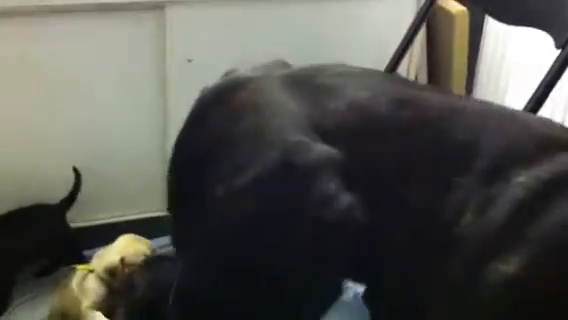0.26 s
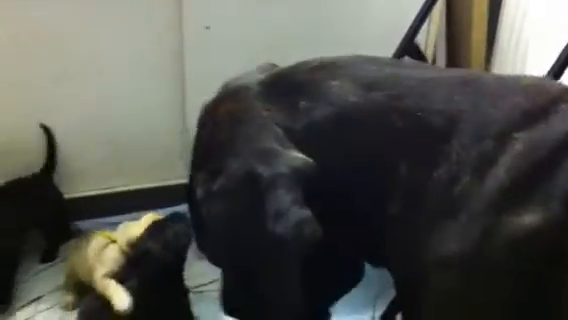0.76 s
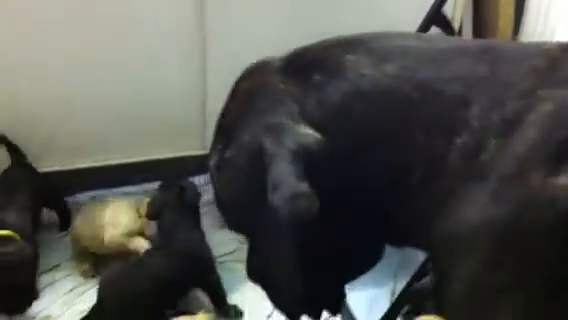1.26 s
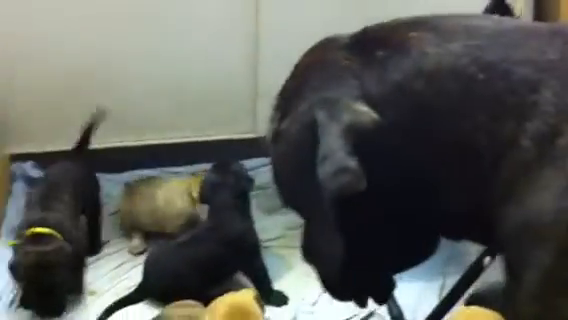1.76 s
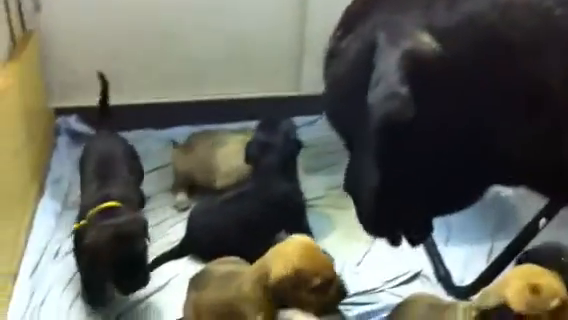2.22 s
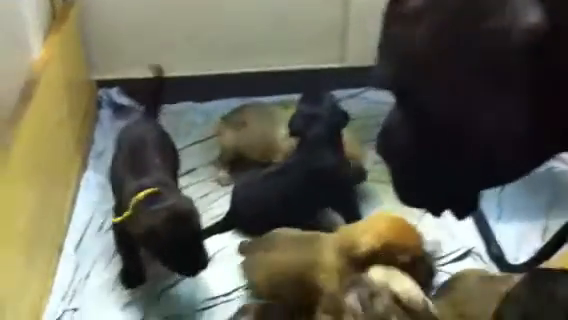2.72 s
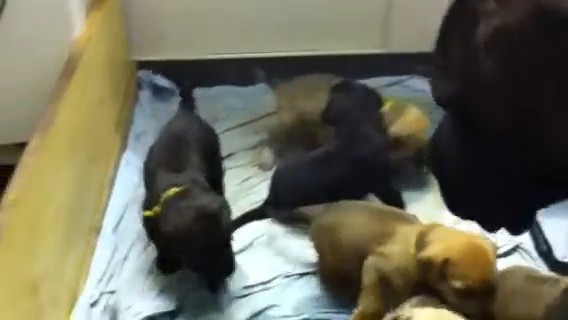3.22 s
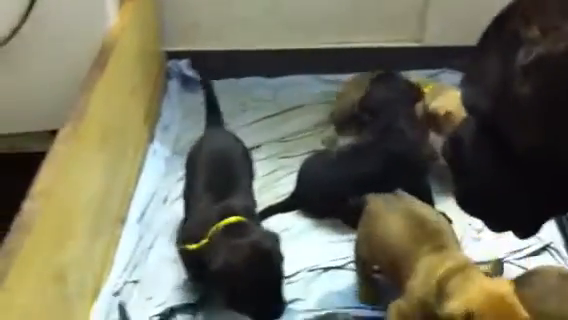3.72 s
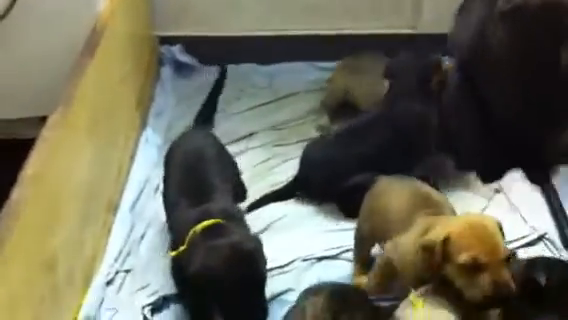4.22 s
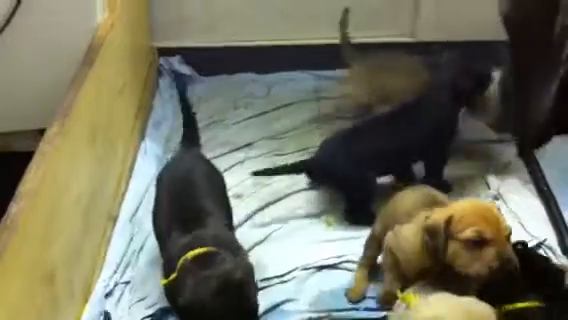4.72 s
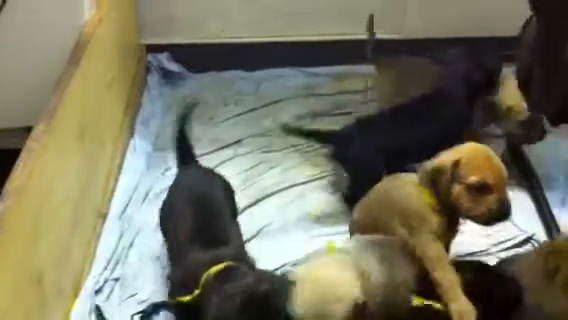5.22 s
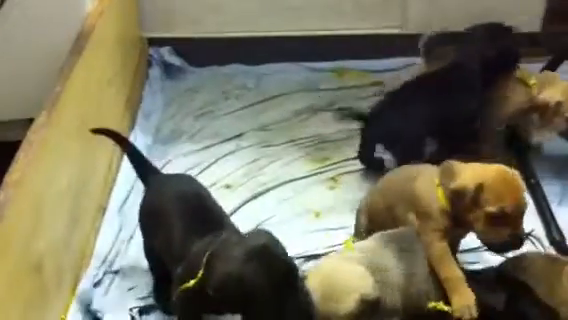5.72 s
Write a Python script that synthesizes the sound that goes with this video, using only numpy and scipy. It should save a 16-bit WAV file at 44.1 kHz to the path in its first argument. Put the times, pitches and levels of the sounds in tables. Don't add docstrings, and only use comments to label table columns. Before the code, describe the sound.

A close single microphone in a whelping box hears near quiet at first, then faint puppy grunts and short whimpers. The middle bursts into several piercing yelps with rough, growly tails, ringing briefly off hard walls. Afterwards the calls shrink to low grunts, a breaking squeak and breathy whimpers, while paws scrape dry, papery sheeting and claws tick. Soft room hum stays underneath.

```python
import sys
import numpy as np
from scipy import signal
from scipy.io import wavfile
from scipy.ndimage import uniform_filter1d

SR = 44100
rng = np.random.default_rng(int(sys.argv[2]) if len(sys.argv) > 2 else 0)


def log_audio(samples):
    frames = np.atleast_2d(samples).T
    limited = np.clip(frames, -1, 1)
    pcm = np.round(limited * 32767).astype(np.int16)
    wavfile.write(sys.argv[1], SR, pcm)


def natural_amplitude(level_db):
    exponent = np.asarray(level_db, float) / 20
    return 10 ** exponent


N = 263409


def evened(x):
    return x / np.sqrt(np.mean(x ** 2) + 1e-20)


def smooth_twice(x, size):
    return uniform_filter1d(uniform_filter1d(x, size=size), size=size)


def read(points, hz):
    f, value = np.transpose(points)
    return np.interp(np.log(hz + 1), np.log(f + 1), value)


def add(mix, s, sound):
    part = mix[round(s * SR):][:len(sound)]
    part += sound[:len(part)]


def resonate(x, hz, width):
    turn = np.exp(2j * np.pi * np.cumsum(hz * np.ones(len(x))) / SR)
    r = np.exp(-np.pi * width / SR)
    return 2 * (turn * signal.lfilter([1 - r], [1, -r], x / turn + 1e-18)).real


def steep(x, hz, width):
    return resonate(resonate(x, hz, width), hz, width)


def coloured(points, patchy_db, swell_db):
    frames, hz = N // 256 + 5, np.fft.rfftfreq(1024, 1 / SR)
    a, b, patches = rng.standard_normal((frames, 513, 3)).T
    patches = uniform_filter1d(patches, size=6, axis=0)
    patches = evened(uniform_filter1d(patches, size=10, axis=1))
    swell = evened(uniform_filter1d(rng.standard_normal(frames), size=12))
    shape = np.where(hz < points[-1][0], read(points, hz), -120)[:, None]
    z = (a + 1j * b) * natural_amplitude(shape + patchy_db * patches + swell_db * swell)
    return evened(signal.istft(z, nperseg=1024, noverlap=768)[1][:N])


def room_hum():
    # (frequency [Hz], density [dB per Hz])
    hum_colour = [(15, -82.5), (25, -44.5), (80, -29), (174, -2.5), (359, -3), (389, -20), (470, -2),
                  (763, -12.5), (999, -10), (1760, -21.5), (15600, -24.5)]
    return natural_amplitude(-63.5) * coloured(hum_colour, patchy_db=3.0, swell_db=.5)


def larynx(t, hz, rough):
    wobble, shimmer, noise = rng.standard_normal((3, SR // 2))
    wobble = evened(uniform_filter1d(wobble, size=120))[:len(t)]
    shimmer = evened(smooth_twice(shimmer, 150))[:len(t)]
    turns = np.cumsum(uniform_filter1d(hz, size=200) * (1 + (.01 + .11 * rough) * wobble)) / SR
    k = np.arange(1, 30)[:, None]
    spread = rng.random(k.shape) * np.clip(k / 8, 0, 1)
    harmonics = np.cos(2 * np.pi * (k * turns + spread)) * (k * hz < 7500)
    folds = evened(harmonics.sum(axis=0))
    puffs = evened((.5 + np.exp(-(turns % 1) / .3)) * noise[:len(t)])
    uneven = natural_amplitude(3 * rough * np.clip(shimmer, -1.5, 1.5))
    drive = uneven * ((1 - rough) * folds + rough * puffs)
    airy = uneven * ((1 - rough) * folds + (1.2 * rough + .12) * puffs)
    return drive, airy, puffs


def chest_tone(drive, rough, chest_hz):
    shut = np.clip((480 - chest_hz) / 150, 0, 1)
    nasal = (0.45 + 1.4 * rough) * steep(drive, 790, 330)
    low = 2.1 * steep(drive, chest_hz, 150) + nasal
    return evened((1 - shut) * steep(drive, chest_hz, 370) + shut * low)


def bright_tone(airy, puffs, hiss_db, whistle_db, short):
    # (centre [Hz], width [Hz], level [dB])
    throat_bands = [(2824, 320, -0.5), (3790, 2100, 10.5), (4580, 2170, 13.5), (5724, 1380, 2)]
    # (centre [Hz], width [Hz], level [dB])
    teeth_bands = [(7200, 3700, 11), (8490, 2000, -6), (10150, 660, 3)]
    flutter = evened(smooth_twice(rng.standard_normal((4, SR // 2)), 900))[:, :len(airy)]
    throat = np.zeros(len(airy))
    for n, (f, width, db) in enumerate(throat_bands):
        throat += (-1) ** n * natural_amplitude(db + 3.3 * flutter[n]) * steep(airy, f * short, width)
    teeth = evened(sum(natural_amplitude(db) * steep(puffs, f, width) for f, width, db in teeth_bands))
    whistle = evened(steep(steep(puffs, 12200, 2600), 12200, 2600))
    return evened(throat) + natural_amplitude(hiss_db) * teeth + natural_amplitude(whistle_db) * whistle


def voice(rows, hiss_db, whistle_db, short):
    # (time [s], roughness [0 clear whistle to 1 growl]); a breathy puff opens the loud yelps
    roughness = [(.69, .08), (1, .15), (1.3, .35), (1.41, .4), (1.43, .12), (1.7, .15), (1.8, .6),
                 (1.85, .2), (1.9, .18), (1.96, .25), (2.105, .6), (2.125, .06), (2.21, .08), (2.225, .3),
                 (2.33, .3), (2.35, .85), (2.45, .85), (2.615, .5), (2.64, .13), (2.72, .13), (2.75, .75),
                 (2.8, .75), (2.83, .7), (2.89, .7), (3.09, .9), (3.105, .8), (3.115, .2), (3.16, .3),
                 (3.24, .35), (3.26, .08), (3.39, .08), (3.585, .7), (3.6, .12), (3.675, .12), (3.69, .3),
                 (3.78, .2), (3.87, .15), (4.022, .7), (4.035, .04), (4.095, .05), (4.125, .18), (4.15, .6),
                 (4.23, .65), (4.38, .2), (4.7, .15), (4.84, .05), (4.9, .05), (4.92, .2), (4.99, .3),
                 (5.24, .4), (5.26, .15), (5.33, .3), (5.43, .3), (5.59, .9), (5.76, .9), (5.92, .5),
                 (5.95, .3)]
    # (time [s], centre [Hz])
    chest_curve = [(.7, 520), (.75, 347), (1.05, 220), (1.27, 298), (1.42, 790), (1.6, 696), (1.85, 740),
                   (1.93, 614), (2.2, 670), (2.24, 860), (2.33, 890), (2.35, 320), (2.45, 320), (2.62, 863),
                   (2.73, 810), (2.79, 630), (2.81, 300), (2.89, 290), (3.1, 722), (3.17, 947), (3.26, 714),
                   (3.67, 715), (3.7, 666), (3.74, 797), (4.09, 600), (4.12, 730), (4.14, 320), (4.4, 236),
                   (4.7, 250), (4.84, 850), (4.95, 884), (5.3, 760), (5.76, 696), (5.92, 1305)]
    s, *columns = np.transpose(rows)
    t = np.arange(s[0], s[-1], 1 / SR)
    mouth_db, hz, mouth_hz, chest_db, bright_db = (np.interp(t, s, c) for c in columns)
    rough = np.interp(t, *np.transpose(roughness))
    chest_hz = np.interp(t, *np.transpose(chest_curve))
    drive, airy, puffs = larynx(t, hz, rough)
    chest = chest_tone(drive, rough, chest_hz)
    mouth = resonate(steep(drive, mouth_hz, 700), mouth_hz, 1500)
    mouth = evened(mouth + 0.099 * steep(drive, 2130, 720))
    bright = bright_tone(airy, puffs, hiss_db, whistle_db, short)
    opening = np.clip((t - s[0]) / .022, 0, 1)
    sound = mouth + natural_amplitude(chest_db) * chest + natural_amplitude(bright_db) * bright * opening
    edge = np.clip(np.minimum((t - s[0]) / 0.003, (s[-1] - t) / .012), 0, 1)
    return s[0], natural_amplitude(mouth_db) * sound * np.sin(np.pi / 2 * edge) ** 2


def puppies():
    # (time [s], mouth level [dB], pitch [Hz], mouth resonance [Hz],
    # chest level [dB re mouth], bright level [dB re mouth])
    early = [
        [(.69, -70.5, 474, 1470, 22, -16), (.712, -61.5, 456, 1480, 11, -25), (.727, -82, 450, 1480, 0, -12),
         (.734, -77.5, 360, 1600, 23, -14), (.77, -80, 348, 1600, 9, -9)],
        [(1.022, -74, 232, 1540, 12, -14), (1.035, -60, 241.7, 1420, 15, -23),
         (1.055, -78, 213.5, 1510, 20, -17), (1.085, -82, 217, 1550, 25, -8)],
        [(1.24, -76, 259, 1580, -7, -10), (1.262, -71, 256, 1570, 11, -10), (1.3, -90, 252, 1580, 13, -5)],
        [(1.415, -57, 515, 1630, -4, -33), (1.44, -49, 571.4, 1650, 0.5, -10),
         (1.48, -34, 549.7, 1600, -13, -9), (1.51, -53.5, 521.5, 1550, 4, 7.5),
         (1.535, -43.5, 494.5, 1670, -2, -12), (1.575, -63, 484, 1910, -2, -8)],
        [(1.535, -61, 668, 1870, 4, -15), (1.57, -51, 661, 1900, -0.5, -26), (1.63, -74.5, 668, 1970, 11, -15),
         (1.69, -69, 672, 1950, 6, -16)],
        [(1.805, -56, 402.6, 2010, 1.5, -20), (1.833, -50, 406.5, 1730, 1, -24),
         (1.87, -54, 438, 1390, 1, -18.5), (1.903, -55, 459.5, 1860, 6, -26.5),
         (1.915, -57.5, 402, 1890, 15, -23.5), (1.955, -72.5, 388, 1840, 6.5, -15.5)],
        [(2.107, -43.5, 567, 1550, -16, -18.5), (2.13, -35, 595, 1390, -25, -7),
         (2.15, -19, 678.6, 1560, -34.5, -8), (2.168, -12, 757, 1563, -31.5, -7.5),
         (2.19, -16, 745.4, 1587, -31.5, -4.5), (2.214, -22, 717.3, 1420, -40, 1.5),
         (2.228, -16, 518, 1550, -11.5, -8.5), (2.26, -31.5, 459, 1710, -6.5, 2.5),
         (2.3, -28.5, 437, 1620, -10, -18), (2.335, -43, 430.5, 1530, 5, -33),
         (2.35, -38.5, 306.6, 1600, 0, -4), (2.41, -49.5, 298.4, 1534, 6.5, -16.5),
         (2.45, -66, 283, 1575, 8.5, -11)],
        [(2.615, -46.5, 386, 1780, 2, -23), (2.635, -34.5, 412.6, 1740, -13.5, -13),
         (2.66, -26.5, 474.5, 1890, -14.5, -5), (2.682, -26.5, 511, 1760, -8, -3.5),
         (2.705, -27, 480, 1850, -21, 0), (2.735, -21.5, 435.3, 1700, -12.5, -13.5),
         (2.755, -52, 431, 1770, 18.5, -13), (2.77, -34, 302, 1710, 5, -5), (2.79, -52.5, 261.9, 1800, 12, -1),
         (2.84, -54.5, 272.2, 1740, 15, -4.5), (2.89, -104.5, 270, 1800, 1, -11)],
    ]
    # ([s], [dB], [Hz], [Hz], [dB], [dB])
    late = [
        [(3.092, -28, 566, 1936, -12.5, -6), (3.112, -24, 576.6, 1710, -30, -4.5),
         (3.135, -18, 668.2, 1806, -35, -6), (3.155, -11, 759.5, 1856, -22, -7),
         (3.168, -17.5, 489.4, 1870, -17.5, -2), (3.19, -19, 436.8, 1700, -8, -2),
         (3.22, -29, 417.4, 1730, -18, -6), (3.255, -37, 392, 1740, 2, -11.5),
         (3.275, -53.5, 381.7, 1680, 1.5, 2), (3.325, -63, 388, 1670, 22.5, -6),
         (3.365, -51, 405.5, 1670, 7, -19), (3.388, -79, 409, 1814, 1, -5)],
        [(3.587, -41, 587.8, 1610, -35, -0.5), (3.615, -27, 617.2, 1536, -53.5, -11),
         (3.638, -19, 706, 1570, -41, -7), (3.657, -22, 737.8, 1620, -18, -7),
         (3.676, -16, 734.7, 1600, -47, -10), (3.688, -22.5, 513.4, 1770, -12.5, -7),
         (3.715, -25.5, 479.2, 1780, -14.5, -1.5), (3.76, -32.5, 400.6, 1670, -6.5, -9.5),
         (3.82, -62.5, 395.6, 1770, 9.5, -2), (3.87, -67, 395, 1780, -7.5, 3)],
        [(4.024, -39, 584.7, 1740, -11, 9), (4.045, -46, 593.6, 1604, -16, 0),
         (4.062, -25.5, 551.9, 1490, -32, -10.5), (4.088, -27, 589.2, 1630, -24, -2),
         (4.105, -27, 508.6, 1650, -35, -5.5), (4.118, -26.5, 480, 1550, -18, -6.5),
         (4.135, -24, 392, 1600, -15, -2), (4.16, -38.5, 316, 1640, -4.5, -17), (4.19, -51, 307, 1650, 4, 13),
         (4.225, -75, 298, 1700, -2, -13)],
        [(4.382, -63.5, 240.6, 1612, 11.5, -26), (4.4, -50, 226, 1594, 8, -22),
         (4.42, -57.5, 225.2, 1550, -3, -21), (4.445, -74, 228, 1600, 13, -26.5)],
        [(4.618, -58.5, 247.4, 1595, 19.5, -18), (4.645, -52.5, 255.2, 1450, 2.5, -35),
         (4.69, -69.5, 246.4, 1476, 4.5, -11.5)],
        [(4.842, -65, 793, 1660, 16, -18), (4.86, -48.5, 821, 1706, -1.5, -33),
         (4.876, -46.5, 929, 1688, -7, -27), (4.905, -57, 991, 1804, 4.5, -7),
         (4.915, -40, 482.5, 1510, 1.5, -25), (4.945, -48.5, 501.3, 1440, -11, -14),
         (4.99, -53, 468, 1460, -3, -14)],
        [(5.245, -55.5, 790, 1705, 2.5, -36), (5.28, -39.5, 836, 1600, -8, -11),
         (5.305, -32.5, 742, 1525, -10.5, -27), (5.325, -41, 695.5, 1620, -18, -12.5),
         (5.36, -48, 731, 1550, 8.5, -25), (5.4, -71, 725, 1530, -1.5, -23), (5.43, -74, 723, 1520, 10, 6)],
        [(5.592, -51, 720, 1950, -14, -22), (5.615, -49, 720, 2100, -12, -20),
         (5.645, -45, 705, 1950, -11, -19), (5.7, -48, 720, 1560, -2, -22), (5.725, -60, 720, 1550, 3, -14),
         (5.76, -70, 706, 1600, 2, -14)],
        [(5.924, -51, 488.6, 1980, -12, -10), (5.945, -47, 464, 2200, -1, -5.5),
         (5.99, -37, 473, 2280, -2, -7.5)],
    ]
    # (hiss near 8 kHz [dB re bright], hiss near 12 kHz [dB re bright], throat shortness [factor])
    breath = [(-20, -30, .98), (-20, -30, .98), (-20, -30, .98), (-10.5, -36, 0.87), (-17, -27, 0.77),
              (-13.5, -25, 0.35), (-17.5, -46.5, 1), (-11.5, -41.5, 1.03), (-17, -26, 0.99),
              (-16, -17.5, 1.005), (-18, -27, .95), (-17.5, -25.5, 1.01), (-13.5, -26, .98), (-1, -2, 1.2),
              (-9, -14.5, 0.92), (-2.5, -15, 1.21), (-21, -18, 0.87)]
    out = np.zeros(N)
    for rows, hiss in zip(early + late, breath):
        add(out, *voice(rows, *hiss))
    return out


def knocks(events):
    out, t = np.zeros(N), np.arange(2600) / SR
    for s, db, hz in events:
        burst = rng.standard_normal(len(t)) * np.exp(-t / (0.0026 + 4.9 / hz))
        burst = resonate(resonate(burst, hz, 0.52 * hz), hz, 1.0 * hz)
        add(out, s, natural_amplitude(db) * burst / abs(burst).max())
    return out


def claws():
    # (time [s], peak [dB], centre [Hz])
    ticks = [
        (3.0285, -50, 2213),
        (5.1253, -53, 2118),
        (5.1806, -47, 2116),
        (0.9094, -52, 13100),
        (5.4301, -46, 13020),
        (5.5628, -55, 11700),
        (5.7364, -46.5, 12360),
    ]
    return knocks(ticks)


def bodies():
    # (time [s], peak [dB], centre [Hz])
    bumps = [
        (1.029, -54, 200),
        (3.19, -47, 210),
        (4.081, -42.5, 178),
        (4.314, -64, 170),
        (5.289, -48, 270),
    ]
    return knocks(bumps)


def bedding():
    # (time [s], level [dB])
    rustles = [
        [(1.68, -89), (1.746, -70), (1.778, -75), (1.794, -65), (1.82, -68)],
        [(1.98, -73), (2.022, -64), (2.056, -72), (2.07, -73)],
        [(4.55, -82), (4.624, -73.5), (4.654, -72), (4.824, -74), (4.83, -84), (4.85, -66.5)],
        [(5.25, -78), (5.284, -52.5), (5.422, -67.5), (5.43, -57.5), (5.556, -73), (5.56, -66), (5.6, -74)],
        [(5.8, -70.5), (5.834, -79), (5.888, -62.5), (5.954, -65), (5.972, -57)],
    ]
    # (frequency [Hz], density [dB per Hz])
    paper = [(1470, -34), (2500, 0), (6710, -3), (7240, -4.5), (8120, -8.5), (11600, 3), (15600, -8.5)]
    t, level = np.arange(N) / SR, np.zeros(N)
    for rows in rustles:
        s, db = np.transpose(rows)
        level += natural_amplitude(np.interp(t, s, db, left=-120, right=-120))
    return uniform_filter1d(level, size=300) * natural_amplitude(-0.5) * coloured(paper, patchy_db=3.5, swell_db=2.5)


def room(x):
    # (frequency [Hz], time to fall 60 dB [s])
    decay = [(250, .38), (700, .32), (1700, .39), (4500, .34), (10000, .24)]
    # (delay [s], gain [factor])
    walls = [(.0021, 0.079), (.0037, -0.27), (.0062, 0.16), (.0095, -0.23), (.014, .25), (.019, 0.25)]
    taps = np.zeros(SR)
    at = np.arange(300, SR - 20, 20)
    taps[at + rng.integers(0, 20, len(at))] = rng.choice([-1., 1.], len(at))
    hz, t, z = signal.stft(taps, SR, nperseg=256)
    tail = signal.istft(z * natural_amplitude(-60 * t / read(decay, hz)[:, None]), SR, nperseg=256)[1]
    tail = natural_amplitude(-5) * tail / np.linalg.norm(tail)
    tail[0] += 1
    for delay, gain in walls:
        tail[round(delay * SR)] += gain
    return signal.fftconvolve(x, tail / np.linalg.norm(tail))[:N]


def scene():
    near = puppies() + claws() + bodies()
    near = signal.sosfilt(signal.butter(4, 170, "high", fs=SR, output="sos"), near)
    near = signal.sosfilt(signal.butter(8, 13300, "low", fs=SR, output="sos"), near)
    return (room(near) + bedding() + room_hum())[None]


def roll_off(x):
    return signal.sosfilt(signal.butter(12, 15710, fs=SR, output="sos"), x)


def record(dry):
    hz, _, z = signal.stft(dry[0], SR, nperseg=2048, noverlap=1024)
    bands = z[:1024].reshape(64, 16, -1)
    level_db = 10 * np.log10((abs(bands) ** 2).mean(axis=1) + 1e-20)
    limit_db = level_db.max(axis=0) - 50.5 + 3.0 * rng.standard_normal(level_db.shape)
    keep = (level_db > limit_db) | (hz[:1024:16, None] < 6000)
    kept = np.vstack([(bands * keep[:, None]).reshape(1024, -1), z[1024:]])
    mix = signal.istft(kept, SR, nperseg=2048, noverlap=1024)[1][None, :N]
    return roll_off(mix)


dry = scene()
out = record(dry)
log_audio(out)
```